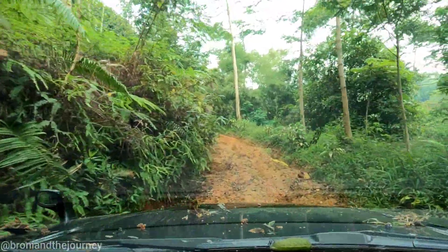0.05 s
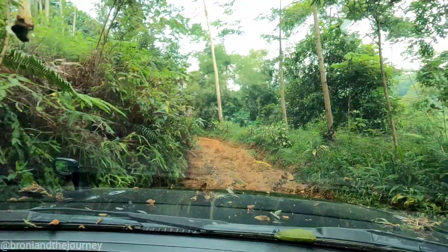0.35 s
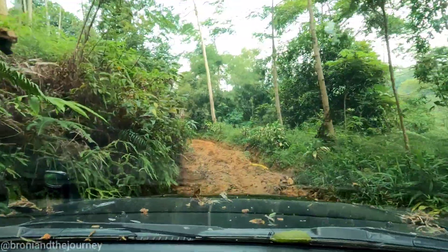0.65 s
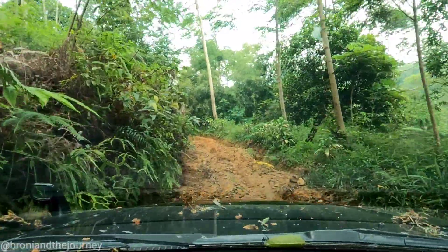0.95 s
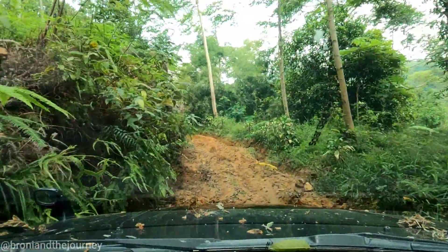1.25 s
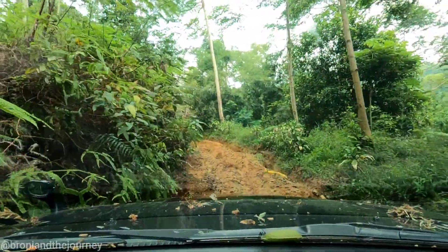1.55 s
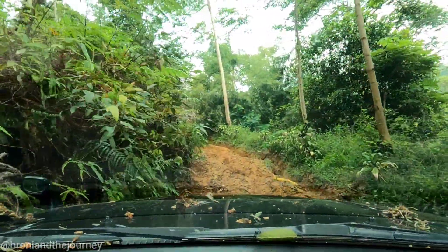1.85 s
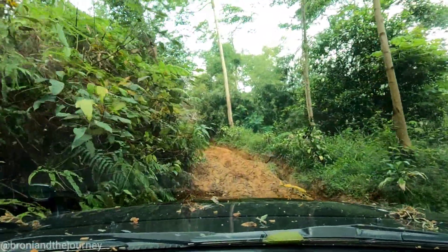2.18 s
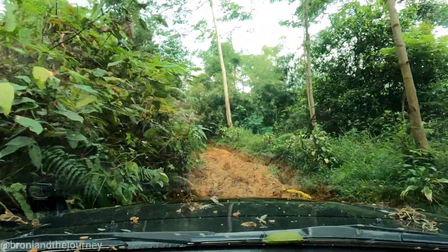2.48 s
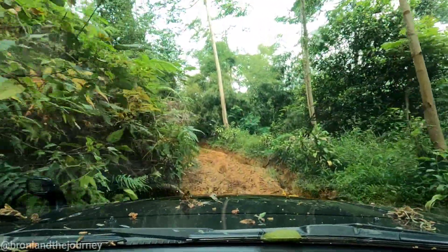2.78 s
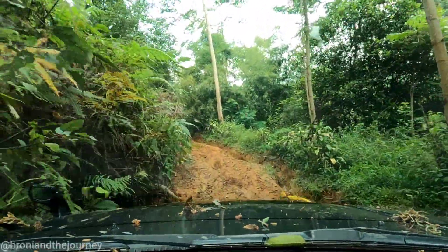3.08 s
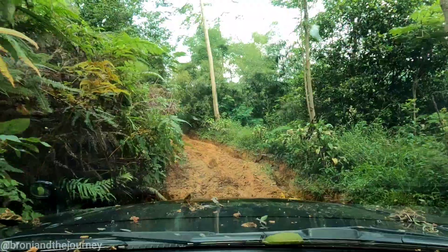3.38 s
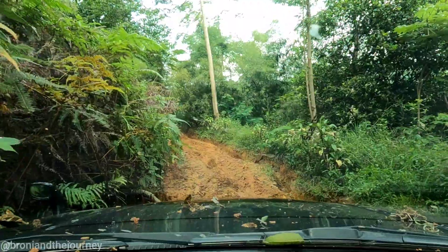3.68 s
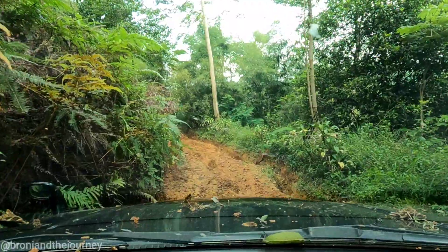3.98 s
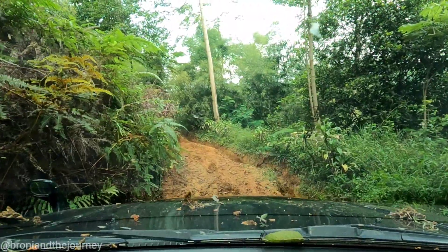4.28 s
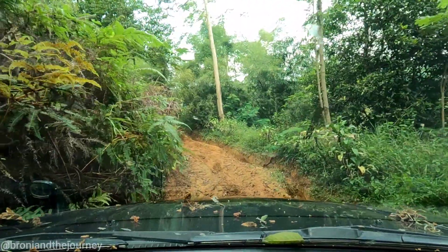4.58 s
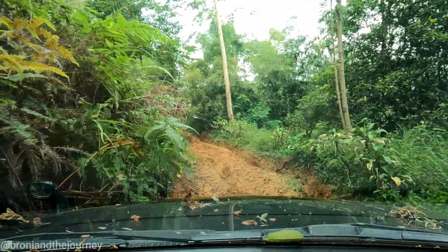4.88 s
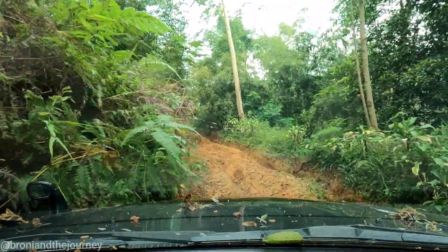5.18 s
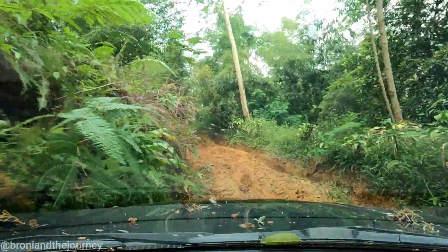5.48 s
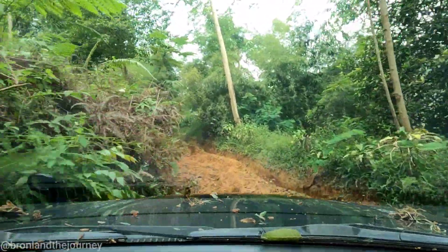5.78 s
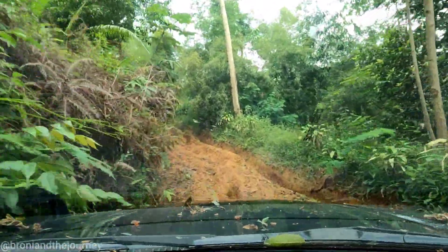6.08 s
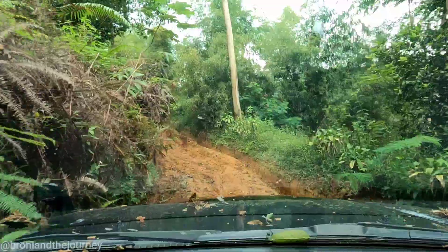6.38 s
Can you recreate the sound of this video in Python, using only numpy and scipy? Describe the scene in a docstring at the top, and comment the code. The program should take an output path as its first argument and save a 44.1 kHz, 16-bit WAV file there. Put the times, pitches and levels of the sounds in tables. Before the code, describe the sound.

A four-wheel drive's engine booms and lugs under load, heard from inside, as the body knocks over ruts and twigs slap the side.

```python
"""A booming engine, heard from the cabin of a four-wheel drive crawling up a rutted dirt trail.
It lugs down and picks up; its firing orders drone, growl and howl under load through pipe and cabin
resonances, and panels sing along. The body rumbles and knocks over ruts and groans in its mounts.
Tyres scrabble on loose dirt, ferns and twigs brush the side, and loose trim squeaks and chatters."""
import sys
import numpy as np
from scipy import signal
from scipy.fft import rfft, irfft, next_fast_len
from scipy.io import wavfile
from scipy.ndimage import uniform_filter1d, map_coordinates

SR = 44100
rng = np.random.default_rng(int(sys.argv[2]) if len(sys.argv) > 2 else 0)


def store_pcm(level_fs):
    """Save levels as 16-bit WAV."""
    pcm = np.round(np.clip(level_fs, -1, 1) * 32767).astype(np.int16)
    wavfile.write(sys.argv[1], SR, np.atleast_2d(pcm).T)


N = 293265

# Engine speed. Each row: time in seconds, firing rate in Hz. An order is a multiple of this rate.
FIRING_HZ = [(0, 83.7), (.15, 83.13), (.3, 85.7), (.5, 86.3), (.8, 71.67), (1.03, 72.33), (1.28, 70.63),
             (1.8, 73.9), (2.25, 69.27), (2.66, 78.15), (2.87, 77.8), (3.33, 70.93), (3.78, 56.6),
             (3.95, 59.1), (4.19, 68.8), (4.41, 59.95), (4.57, 60.2), (4.7, 63), (4.94, 60.37),
             (5.1, 62.96), (5.28, 70.1), (5.45, 71.55), (5.78, 67.83), (6.15, 77.3), (6.32, 70.5),
             (6.65, 69.45)]
# Engine pull. Each row: time in seconds, load from 0 to 1.
LOAD = [(0, 0.18), (.8, 0.28), (1.03, 0.76), (1.52, 0.38), (2.25, 0.54), (2.55, 0.98), (2.9, 0),
        (3.12, 0.23), (3.6, 0.23), (3.84, 0.23), (4.25, 0.8), (5.0, 0.68), (5.45, 0.46), (5.75, 0.39),
        (6.0, 0.77), (6.16, 0.91), (6.33, 0.24), (6.65, 0.3)]
# Exhaust boom, order 1. Each row: time in seconds, level in dB.
BOOM_DB = [(0, -28), (.4, -29), (.8, -21), (1.12, -36.5), (1.52, -22), (2.05, -21.5), (2.42, -27.5),
           (2.68, -19.5), (3.25, -19.5), (3.6, -16), (5.05, -16), (5.45, -29.5), (5.62, -23), (6.0, -23.5),
           (6.27, -32.5), (6.65, -25.5)]
# Pipe resonances. Each holds: centre in Hz, width in Hz, full-load level in dB, no-load drop in dB.
GROWL_PIPE = (216.5, 35.5, -32, 19.5)
HOWL_PIPE = (299, 19, -14, 51.5)
# Howl overtones. Each row: order, level in dB against the howl.
HOWL_OVERTONES = [(6, -18), (9, -26)]
# Weak upper orders. Each row: order, relative level in dB.
UPPER_ORDERS = [(2.5, -13.5), (3.5, -10), (4.5, -13), (5.75, -15), (6, -12.5), (7, -10.5), (8, -16.5)]
# Cabin resonances. Each row: centre in Hz, width in Hz, peak in dB.
CABIN_MODES = [(257, 34, -1), (313, 3.2, -20), (418.3, 42, 1)]
# Accessory whine. Each row: time in seconds, level at housing resonance in dB.
WHINE_DB = [(0, -67), (2, -70), (2.6, -50), (4, -56), (4.6, -39.5), (5.3, -51), (5.8, -46.5), (6.65, -47.5)]
# Panels singing. Each row: peak time in seconds, level in dB, order, half length in seconds.
SINGING = [(0.33, -44, 5, 0.13), (0.353, -44, 6, 0.049), (.35, -43, 6.5, 0.053), (1.75, -43, 3, .19),
           (2.52, -35.5, 4, .1), (2.704, -50, 7, 0.082), (2.946, -38.5, 2.5, 0.087), (4.844, -54, 9, 0.25),
           (4.915, -40, 5, 0.037), (5.095, -34, 5, 0.013), (5.293, -46, 6, 0.03), (5.805, -44, 6, 0.032),
           (6.08, -36, 4, .1)]

# Running noise laws. Each holds: base in dB, slope in dB per Hz of firing rate, full-load rise in dB.
ROAR_LAW = (-44, 0.16, 3.9)
CLATTER_LAW = (-52, 0.23, 2.3)
# Throttle's effect on running noise. Each row: time in seconds, gain in dB.
THROTTLE_DB = [(0, -0.5), (2.8, 1), (3.2, -1.5), (3.5, 0.5), (3.68, -0.5), (3.76, -2.5), (4.05, -2),
               (4.3, 0), (5.8, 0), (6.1, -1.5), (6.35, 0.5), (6.65, 3)]
# Metal cover ringing. Each row: time in seconds, level in dB against the clatter.
CASING_DB = [(0, -21.5), (2.2, -19.5), (2.85, -16.5), (3.4, -15), (4.4, -20), (4.85, -14.5), (5.6, -15),
             (6.2, -24), (6.65, -24)]
# Tyre slips. Each row: peak time in seconds, grit level in dB, half length in seconds.
SLIPS = [(.1, -50, 0.087), (.52, -42.5, 0.051), (.7, -50.5, 0.11), (1.0, -49, 0.07), (1.88, -46.5, 0.096),
         (2.25, -54.5, 0.071), (3.45, -56.5, 0.07), (3.61, -46.5, 0.024), (4.42, -47.5, 0.11),
         (4.75, -50.5, 0.022), (4.833, -45, 0.008), (5.14, -53, .03), (5.49, -49, 0.037),
         (6.48, -54, 0.063), (6.64, -63, 0.026)]
# Body shake over ruts. Each row: time in seconds, relative level in dB.
SHAKE_DB = [(0, -28), (.45, -22), (1.3, -25.5), (1.55, -27), (2.4, -24.5), (3.65, -30), (3.84, -28.5),
            (4.02, -46), (4.28, -37.5), (4.42, -24), (5.0, -25), (5.55, -23), (6.65, -20.5)]
# Chassis knocks. Each row: start in seconds, level in dB, centre in Hz.
KNOCKS = [(0.269, -19.5, 317), (0.495, -27, 990), (0.469, -22.5, 128.5), (0.529, -17, 95),
          (0.62, -17.5, 83), (0.802, -35, 591.8), (.972, -33, 566.2), (1.27, -26.5, 130), (2.813, -34, 560),
          (3.10, -25, 126.5), (3.122, -35, 843.3), (3.343, -38, 1085), (3.358, -23, 129), (3.361, -22, 297),
          (3.392, -33, 326), (3.602, -37.5, 2070), (3.612, -38, 1410), (3.614, -38, 2240),
          (4.266, -41.5, 2200), (4.315, -31.5, 675.3), (4.405, -33.5, 740), (4.442, -26, 567.4),
          (6.47, -17, 78.8), (6.627, -38.5, 1150)]
# Mount groans. Each row: peak time in seconds, level in dB, centre and width in Hz, half length in seconds.
GROANS = [(0.315, -39.5, 482, 50, 0.12), (0.322, -45.5, 860, 378, 0.11), (2.655, -50.5, 586, 59.8, 0.17),
          (2.968, -36.5, 361, 42, 0.16), (3.763, -39.5, 297, 35, 0.029), (5.809, -37, 288.6, 79.3, .08),
          (4.085, -38, 366.8, 30, 0.08), (4.43, -37, 466, 259, 0.1)]

# Twig slaps. Each row: start in seconds, level in dB, ring pitch in Hz, ring gain from 0 to 1.
TWIGS = [(.033, -42, 3730, 0.64), (0.092, -35.5, 3220, 0.43), (0.54, -36, 4130, 0.2), (2.697, -43, 4200, 0),
         (3.598, -40.5, 4070, 0.9), (3.613, -33.5, 3940, 1), (3.621, -40, 3930, 0.82),
         (3.651, -46, 3900, 0.3), (3.797, -49, 4550, .05), (3.882, -52, 4278, 0), (4.822, -45.5, 3830, 0.3),
         (4.888, -41, 3310, 0.3), (6.284, -36.5, 4240, 0.71), (6.285, -38, 3280, .9),
         (6.627, -41, 3540, 0.62)]
# Modes of a slapped panel. Each row: ratio to the ring pitch, level in dB.
PANEL_MODES = [(1, -0.5), (.58, -10), (1.22, -10.5)]
# Leaves brushing the side. Each row: time in seconds, relative level in dB.
BRUSH_DB = [(0, -66), (1.3, -70), (1.9, -69), (3.5, -67.5), (3.9, -72), (4.4, -66), (5.5, -72),
            (6.2, -64.5), (6.65, -64)]
# Frond sweeps. Each row: peak time in seconds, level in dB, half length in seconds, fizz offset in dB.
SWEEPS = [(0.097, -53, 0.032, -12.5), (0.54, -55, 0.021, -17.5), (.64, -66, 0.034, -10),
          (2.701, -63, 0.015, -18), (3.464, -59, 0.014, -26.5), (3.621, -59, 0.054, -22.5),
          (3.797, -62.5, 0.0066, -26), (3.884, -60.5, 0.0087, -25), (4.871, -64, 0.027, -9.5),
          (5.79, -63, 0.013, -17), (6.016, -59.5, 0.014, -12), (6.128, -63, 0.036, -9),
          (6.234, -64.5, .028, -4), (6.289, -50, 0.0091, -16.5), (6.354, -57, 0.011, -11.5),
          (6.452, -49.5, 0.016, -20), (6.505, -60, 0.018, -11.5)]
# Trim chirps. Each row: peak time in seconds, relative level in dB, pitch in Hz, half length in seconds.
SQUEAKS = [(4.409, -50.5, 2884, .006), (4.482, -47.5, 2800, 0.0029), (4.511, -48.5, 2620, 0.01),
           (6.29, -45, 3124, 0.0052), (6.366, -43.5, 1520, .005)]
# Trim rattles. Each row: peak time in seconds, level in dB, half length in seconds.
RATTLES = [(.54, -52.5, 0.028), (4.85, -56.5, 0.033), (6.02, -56, .025), (6.48, -56, 0.091)]

# Noise spectra. Each row: frequency in Hz, relative density in dB.
RUMBLE_SPECTRUM = [(8, -35), (20, 10.5), (27, 12.5), (40, 13), (50, 4), (65, 4), (100, -12), (160, -55),
                   (500, -150)]
ROAR_SPECTRUM = [(40, -18.5), (90, 0.5), (140, 9.5), (200, 2.5), (280, 2.5), (400, -5), (560, -7.5),
                 (660, -15.5), (760, -13.5), (1000, -30.5), (1500, -27), (4000, -130)]
CLATTER_SPECTRUM = [(500, 2.5), (900, 4.5), (1150, 2), (1330, -2.5), (1700, -4.5), (1980, -5), (2750, -9),
                    (3050, -13.5), (3700, -13), (4800, -23), (8000, -28.5), (11000, -47), (16000, -88.5)]
LEAF_SPECTRUM = [(500, -41), (1500, -7.5), (3500, 6), (5000, -0.5), (7000, -4.5), (8900, -9), (10000, -14),
                 (11200, -20.5), (12500, -18), (14000, -28), (15500, -47.5)]
FIZZ_SPECTRUM = [(4000, -37.5), (7500, -3), (9200, -1.5), (10500, -3.5), (11300, -13), (12800, -8.5),
                 (14200, -17.5), (15500, -29.5)]

CRUISE_HZ, ORDERS_DB_PER_HZ = 70, 0.31
DRONE_DB, DRONE_NO_LOAD_DROP_DB = -21.5, 26.5
BOOM_OVERTONE_DB, FOURTH_DB = -39.5, -16.5  # against boom, drone
GROWL_LEAK_DB, HOWL_LEAK_DB = -13.5, -12  # against the order floor
BELT_ORDER, HOUSING_HZ, HOUSING_WIDTH_HZ = 8.22, 578, 26
CASING_HZ, CASING_WIDTH_HZ = 1822, 70
SLIP_ROAR_DB = 7.5  # against the slip's grit
KNOCK_T60_AT_100_HZ_S, KNOCK_DAMPING_POWER = 0.52, 0.83
TWIG_RING_T60_S, TWIG_RING_WIDTH_HZ = 0.048, 520
TWIG_CRACK_T60_S, TWIG_CRACK_DB = 0.024, -9
RATTLE_PER_S, RATTLE_HZ, RATTLE_SPREAD_OCTAVES, RATTLE_DECAY_CYCLES = 410, 2130, 0.65, 3.5
BAND_LIMIT_HZ = 15460


def engine(fired, phases):
    """Low firing orders come through clean and swell with load; upper ones are weak and unsteady."""
    rate_hz, boom_db, slack = curve(FIRING_HZ), curve(BOOM_DB), 1 - curve(LOAD)
    floor_db = running_db(ROAR_LAW) + ORDERS_DB_PER_HZ * (rate_hz - CRUISE_HZ)
    drone_db = DRONE_DB - DRONE_NO_LOAD_DROP_DB * slack

    def tone(order, gain, rough, flutter_hz=25):
        return gain * order_tone(fired, phases, order, rough, flutter_hz)

    def mode_gain(order, centre_hz, width_hz):
        return np.abs(resonance(rate_hz * order, centre_hz, width_hz)) ** 2

    def cabin(order):
        return 0.64 + sum(amp(db) * mode_gain(order, hz, width_hz) for hz, width_hz, db in CABIN_MODES)

    def piped(order, pipe, leak_db):
        hz, width_hz, full_db, drop_db = pipe
        resonant = amp(full_db - drop_db * slack) * mode_gain(order, hz, width_hz)
        return resonant + cabin(order) * amp(floor_db + leak_db)

    boom = tone(1, amp(boom_db), rough=0.04)
    drone = tone(2, amp(drone_db) + amp(boom_db + BOOM_OVERTONE_DB), rough=0.07)
    growl = tone(3, piped(3, GROWL_PIPE, GROWL_LEAK_DB), rough=0.13)
    howl_gain = piped(5, HOWL_PIPE, HOWL_LEAK_DB)
    howl = tone(5, howl_gain, rough=0.15, flutter_hz=35)
    for order, db in HOWL_OVERTONES:
        howl += tone(order, howl_gain * amp(db), rough=0.52, flutter_hz=50)
    fourth = tone(4, cabin(4) * amp(drone_db + FOURTH_DB), rough=0.08)
    upper = sum(tone(order, cabin(order) * amp(floor_db + db - 2), rough=0.41)
                for order, db in UPPER_ORDERS)
    return boom + drone + growl + howl + fourth + upper


def firings():
    """Running count of firings; the crank turns slightly unevenly."""
    return np.cumsum(curve(FIRING_HZ) * (1 + 0.0049 * wobble(25))) / SR


def order_tone(fired, phases, order, rough, flutter_hz=25):
    """Tone locked to the firings, fluttering in level and phase."""
    angle = 2 * np.pi * (order * fired + phases[round(2 * order)])
    in_phase = (1 + rough * wobble(flutter_hz)) * np.sin(angle)
    quadrature = rough * wobble(flutter_hz) * np.cos(angle)
    return np.sqrt(2) * (in_phase + quadrature)


def body_rumble():
    """Ruts shake the body on its springs: low noise, evened out, then scaled by the shake."""
    noise = coloured(rng.standard_normal(N), RUMBLE_SPECTRUM)
    envelope = uniform_filter1d(np.abs(signal.hilbert(noise)), size=4000)
    return amp(curve(SHAKE_DB) + 4) * unit(noise / (envelope + 0.1))


def running_noise(fired):
    """Roar and clatter pulse with the firings and four-cylinder cycle, and flare as tyres slip."""
    slip = swells(SLIPS)
    roar_gain = np.hypot(amp(running_db(ROAR_LAW) + 6.5), amp(SLIP_ROAR_DB) * slip)
    clatter_gain = np.hypot(amp(running_db(CLATTER_LAW)), slip)
    beat = 1 + 0.043 * np.cos(2 * np.pi * fired) + 0.081 * np.cos(np.pi * fired / 2)
    roar = coloured(grit(clump_db=0.5, rate_hz=58) * beat, ROAR_SPECTRUM)
    grains = grit(clump_db=0.5, rate_hz=420) * (3.7 + beat) * amp(1.5 * wobble(35))
    clatter = coloured(grains, CLATTER_SPECTRUM)
    casing = amp(curve(CASING_DB)) * band(rng.standard_normal(N) * beat, CASING_HZ, CASING_WIDTH_HZ)
    return roar_gain * roar + clatter_gain * (clatter + casing)


def running_db(law):
    """Level that follows engine speed, load and throttle."""
    base_db, db_per_hz, load_db = law
    speed_db = db_per_hz * (curve(FIRING_HZ) - CRUISE_HZ)
    return base_db + speed_db + load_db * curve(LOAD) + curve(THROTTLE_DB)


def knocks():
    """Ruts jolt the chassis: a thud of a few cycles and a dull shudder, shorter at higher pitch."""
    out, t = np.zeros(N + SR), np.arange(SR // 2) / SR
    attack = 1 - np.exp(-t / 0.0012)
    for start_s, db, hz in KNOCKS:
        t60_s = KNOCK_T60_AT_100_HZ_S * (100 / hz) ** KNOCK_DAMPING_POWER
        shudder = band(rng.standard_normal(len(t)), hz, width_hz=0.5 * hz) * amp(-60 * t / t60_s)
        thud = np.sin(2 * np.pi * hz * t) * np.exp(-hz * t / 4)
        out[round(start_s * SR):][:len(t)] += amp(db) * (thud + 0.58 * shudder) * attack
    return out[:N]


def groans():
    """The twisting body rubs in its mounts: noise bands that swell and fade."""
    return sum(swells([(peak_s, db, half_s)]) * band(rng.standard_normal(N), hz, width_hz)
               for peak_s, db, hz, width_hz, half_s in GROANS)


def singing_panels(fired, phases):
    """Cabin panels each ring briefly with one engine order."""
    return sum(swells([(peak_s, db, half_s)]) * order_tone(fired, phases, order, rough=0.15)
               for peak_s, db, order, half_s in SINGING)


def belt_whine(fired, phases):
    """A belt-driven accessory whines, lifted near its housing's resonance."""
    housing = np.abs(resonance(curve(FIRING_HZ) * BELT_ORDER, HOUSING_HZ, HOUSING_WIDTH_HZ))
    whine = order_tone(fired, phases, BELT_ORDER, rough=0.3, flutter_hz=41)
    return housing * amp(curve(WHINE_DB)) * whine


def twigs():
    """Each slap cracks and rings a panel; the twig keeps scraping, so the ring is rough."""
    out, t = np.zeros(N + SR), np.arange(SR // 4) / SR
    attack = 1 - np.exp(-t / 0.0012)
    hiss = coloured(rng.standard_normal(N + SR), LEAF_SPECTRUM)
    for start_s, db, ring_hz, ring_gain in TWIGS:
        def panel(hz):
            return sum(amp(mode_db) * resonance(hz, ratio * ring_hz, TWIG_RING_WIDTH_HZ) ** 2
                       for ratio, mode_db in PANEL_MODES)

        start = round(start_s * SR)
        ring = unit(filtered(rng.standard_normal(len(t)), panel)) * amp(-60 * t / TWIG_RING_T60_S)
        crack = hiss[start:][:len(t)] * amp(TWIG_CRACK_DB - 60 * t / TWIG_CRACK_T60_S)
        out[start:][:len(t)] += amp(db) * (ring_gain * ring + crack) * attack
    return out[:N]


def foliage():
    """Leaves crackle along the side; passing fronds scrape and their dry edges fizz."""
    brush = coloured(grit(clump_db=1.0, rate_hz=1300), LEAF_SPECTRUM)
    scrape = coloured(grit(clump_db=1.5, rate_hz=940), LEAF_SPECTRUM)
    fizz = coloured(grit(clump_db=2.2, rate_hz=1100), FIZZ_SPECTRUM)
    scrape_gain = swells([(peak_s, db, half_s) for peak_s, db, half_s, _ in SWEEPS])
    fizz_gain = swells([(peak_s, db + fizz_db, half_s) for peak_s, db, half_s, fizz_db in SWEEPS])
    return amp(curve(BRUSH_DB) + 4.5) * brush + scrape_gain * scrape + fizz_gain * fizz


def squeaks():
    """Trim rubs as the body flexes: short, slightly falling chirps."""
    out, t, waver = np.zeros(N), np.arange(N) / SR, wobble(700)
    for peak_s, db, pitch_hz, half_s in SQUEAKS:
        near = np.abs(t - peak_s) < 0.04
        offset = (t[near] - peak_s) / half_s
        glide_hz = pitch_hz * (1 - 0.01218 * offset + 0.044 * waver[near])
        chirp = np.sin(2 * np.pi * np.cumsum(glide_hz) / SR)
        out[near] += amp(db + 1.5) * np.exp(-0.5 * offset ** 2) * chirp
    return out


def rattles():
    """Loose trim chatters: a hail of tiny contacts, each with its own pitch and size."""
    out, t = np.zeros(N + SR), np.arange(SR // 50) / SR
    sizes, pitches, jitter = rng.standard_normal((int(RATTLE_PER_S * N / SR), 3)).T
    elapsed = np.cumsum(np.hypot(sizes, jitter))  # bigger contacts follow longer gaps
    starts = (N * elapsed / elapsed[-1]).astype(int)
    for start, size, pitch in zip(starts, sizes, pitches):
        hz = RATTLE_HZ * 2 ** (RATTLE_SPREAD_OCTAVES * np.clip(pitch, -2, 2))
        out[start:][:len(t)] += size * np.sin(2 * np.pi * hz * t) * np.exp(-hz * t / RATTLE_DECAY_CYCLES)
    return swells(RATTLES) * unit(out[:N])


def amp(db):
    return 10 ** (np.asarray(db) / 20)


def unit(x):
    """x at rms 1."""
    return x / np.sqrt(np.mean(x ** 2) + 1e-20)


def curve(rows):
    """(seconds, value) rows interpolated per sample."""
    return np.interp(np.arange(N) / SR, *np.transpose(rows))


def swells(rows):
    """Sum of Gaussian gain bells; half length is one standard deviation."""
    t = np.arange(N) / SR
    return sum(amp(db) * np.exp(-0.5 * ((t - peak_s) / half_s) ** 2) for peak_s, db, half_s in rows)


def wobble(rate_hz):
    """Smooth random curve, rate_hz knots a second."""
    knots = rng.standard_normal(int(N * rate_hz / SR) + 4)
    return map_coordinates(knots, [np.arange(N) * rate_hz / SR])


def grit(clump_db, rate_hz):
    """White noise bunched into tiny grains."""
    return unit(rng.standard_normal(N) * amp(clump_db * wobble(rate_hz)))


def filtered(x, response):
    """x through a complex frequency response."""
    size = next_fast_len(len(x) + 8192)
    return irfft(rfft(x, size) * response(np.fft.rfftfreq(size, 1 / SR)), size)[:len(x)]


def coloured(x, spectrum):
    """x shaped by (Hz, dB) points, at rms 1."""
    points_hz, db = np.transpose(spectrum)
    return unit(filtered(x, lambda hz: amp(np.interp(np.log(hz + 1), np.log(points_hz), db))))


def resonance(hz, centre_hz, width_hz):
    """Response of one damped mode."""
    return 1j * hz * width_hz / (centre_hz ** 2 - hz ** 2 + 1j * hz * width_hz)


def band(x, centre_hz, width_hz):
    """x twice through one mode, at rms 1."""
    return unit(filtered(x, lambda hz: resonance(hz, centre_hz, width_hz) ** 2))


def scene():
    """Mono mix behind the windscreen."""
    fired = firings()
    chassis = body_rumble() + running_noise(fired) + groans() + knocks() + squeaks() + rattles()
    phases = rng.random(64)  # start phase in cycles, one per half order
    tones = engine(fired, phases) + belt_whine(fired, phases) + singing_panels(fired, phases)
    return (tones + chassis + foliage() + twigs())[None]


def record(dry):
    """Brick-wall low-pass."""
    return filtered(dry[0], lambda hz: hz < BAND_LIMIT_HZ)[None]


dry = scene()
out = record(dry)
store_pcm(out)
```